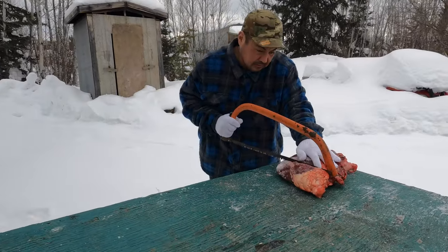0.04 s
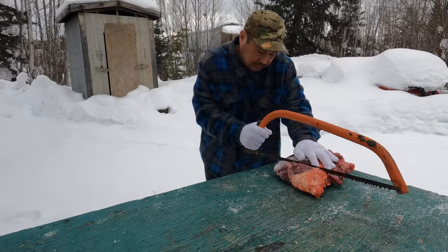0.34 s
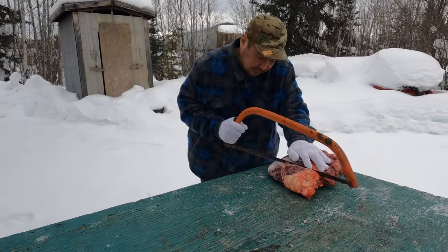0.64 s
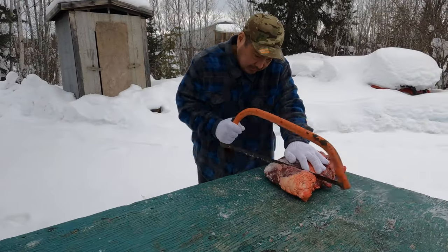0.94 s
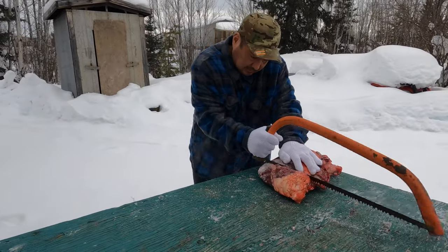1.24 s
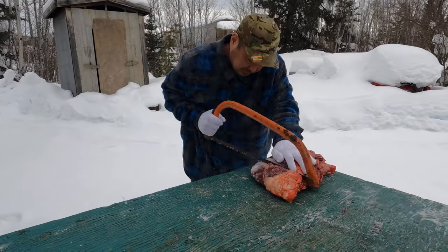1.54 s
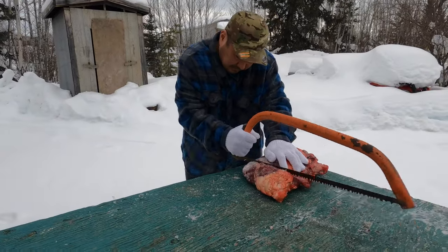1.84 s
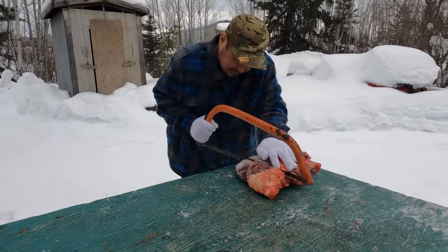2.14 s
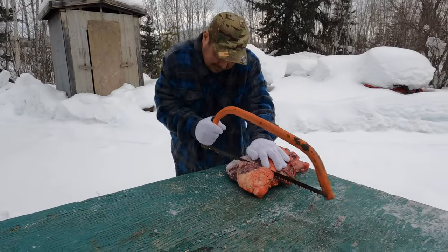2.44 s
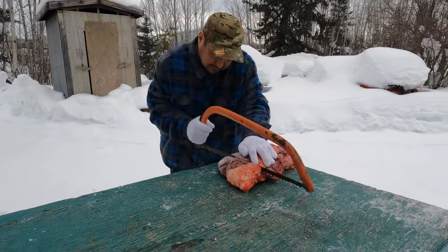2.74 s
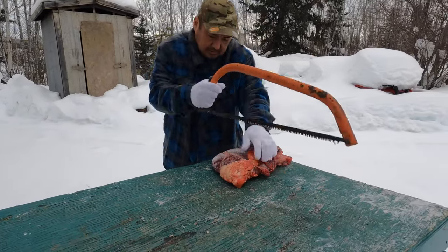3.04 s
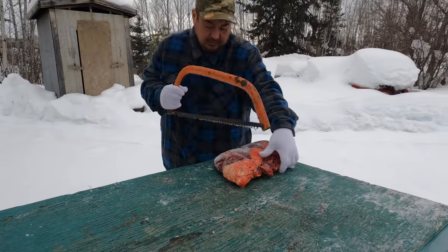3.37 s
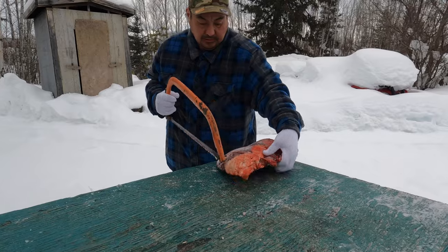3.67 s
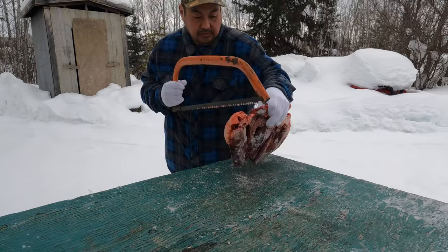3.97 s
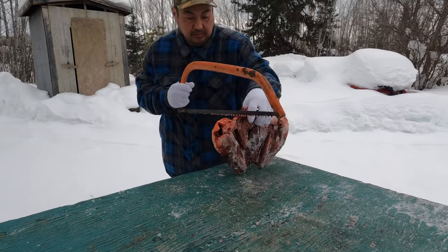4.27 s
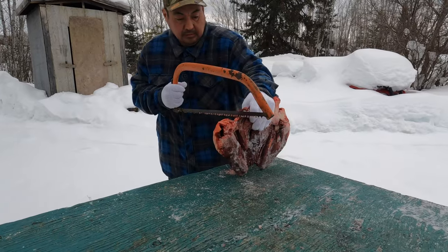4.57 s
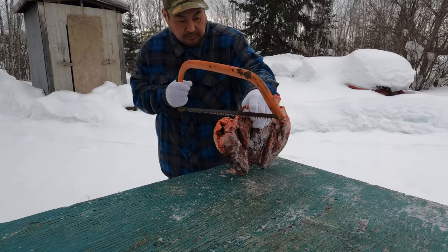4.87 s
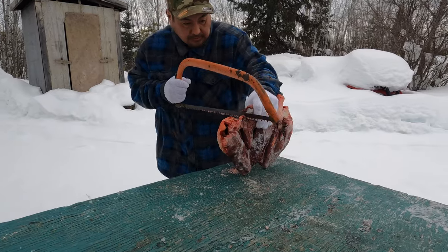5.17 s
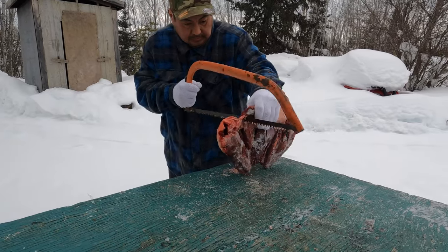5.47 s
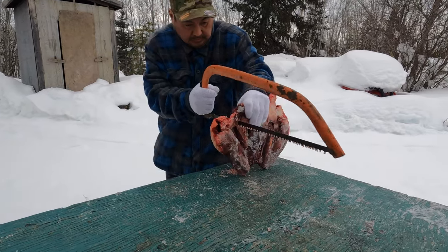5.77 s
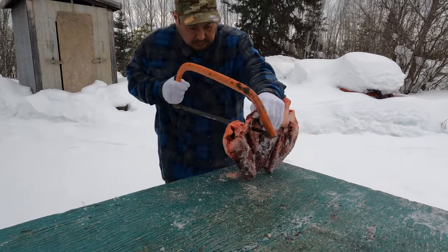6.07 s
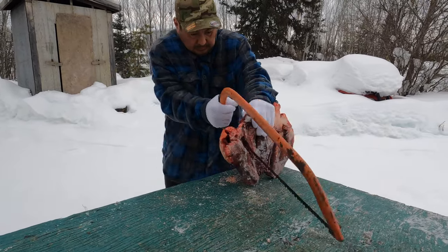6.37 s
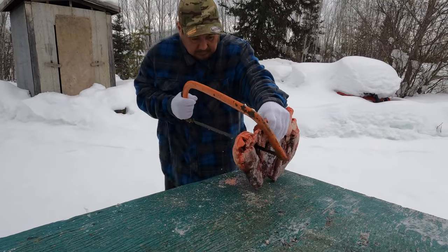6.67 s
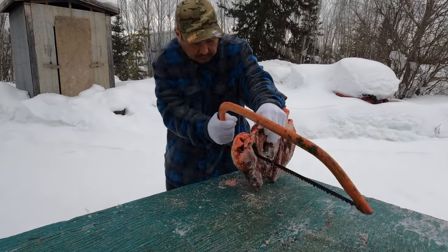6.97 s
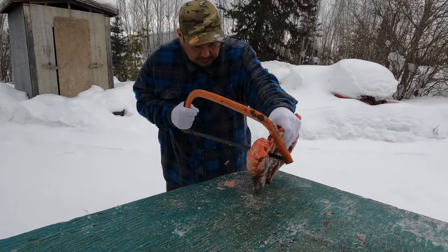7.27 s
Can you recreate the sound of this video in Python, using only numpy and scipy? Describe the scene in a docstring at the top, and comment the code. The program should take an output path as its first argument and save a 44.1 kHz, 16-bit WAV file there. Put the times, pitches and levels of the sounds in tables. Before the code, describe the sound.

Saw strokes hiss and scrape through frozen meat, bumping a plywood table; the joint clatters, then the blade rasps unevenly through bone.

```python
"""A bow saw cuts frozen meat on a plywood table, outdoors in snow, a metre or two away.
Pulls and pushes alternate, and every tooth tears off an icy chip. First the teeth hiss through flesh
while the frame scrapes and bumps the table. The saw breaks through, and the joint of meat is stood
on end with a clatter. Then longer strokes rasp into bone and shake the table top.
The steel blade sings as it slides, and faint outdoor air lies under it all."""
import sys
import numpy as np
from scipy import signal
from scipy.fft import rfft, irfft
from scipy.io import wavfile
from scipy.ndimage import uniform_filter1d

SR = 44100
rng = np.random.default_rng(int(sys.argv[2]) if len(sys.argv) > 2 else 0)


def to_wav(s):
    """Save 16-bit WAV."""
    ch = np.atleast_2d(s).T  # columns
    pcm = np.round(np.clip(ch, -1, 1) * 32767)  # PCM
    wavfile.write(sys.argv[1], SR, pcm.astype(np.int16))


N = 322349
TIME = np.arange(N) / SR
TAP_TIME = TIME[:SR // 3]  # seconds since a tap


def amp(db):
    """Turn decibels into a gain."""
    return 10 ** (np.asarray(db) / 20)


def unit(x):
    """Scale to an average power of 1."""
    return x / np.sqrt(np.mean(x ** 2))


def add(track, start_s, sound):
    """Mix a sound in at a given time."""
    i = max(int(start_s * SR), 0)
    track[i:i + len(sound)] += sound[:N - i]


def wander(per_s, size=N):
    """A random curve, roughly between -1 and 1, that heads for a new value per_s times a second."""
    knots = rng.standard_normal(size // 12)
    return 1.1 * np.interp(TIME[:size] * per_s, np.arange(len(knots)), knots)


def swells(events):
    """Pushes that each build up and let go."""
    force = np.zeros(N)
    for start_s, length_s, db in events:
        add(force, start_s, amp(db) * np.sqrt(np.hanning(int(length_s * SR))))
    return force


def soften(x, hz, kind="low", order=2):
    """Gently keep only the low, or the high, side of a frequency."""
    return signal.sosfilt(signal.butter(order, min(hz, SR / 3), kind, fs=SR, output="sos"), x)


def colour(x, tone, peaks=(), size=4096):
    """Shape a sound with a broad tone curve and ringing peaks that stand on it."""
    hz = np.maximum(np.arange(size // 2 + 1) * SR / size, 1)
    tone_hz, tone_db = np.transpose(tone)
    gain = amp(np.interp(np.log(hz), np.log(tone_hz), tone_db))
    gain *= np.minimum(hz / tone_hz[0], 1) ** 2
    gain *= np.sqrt(1 + sum(amp(2 * db) / (1 + (2 * (hz - f) / width) ** 2) for f, width, db in peaks))
    # make the filter ring after a hit, never before it
    cepstrum = irfft(np.log(unit(gain) + 1e-6))
    cepstrum[1:size // 2] *= 2
    cepstrum[size // 2 + 1:] = 0
    return signal.oaconvolve(x, irfft(np.exp(rfft(cepstrum))))[:len(x)]


def resonate(x, hz, width_hz):
    """Make a sound ring at a pitch that can glide."""
    turn = np.exp(2j * np.pi * np.cumsum(hz) / SR)
    pole = np.exp(-np.pi * width_hz / SR)
    return 2 * np.real(turn * signal.lfilter([1 - pole], [1, -pole], x / turn))


# tone of the outdoor air: f/Hz, level/dB
AIR_TONE = [(20, 20.5), (200, -1.5), (700, -15), (1400, -12), (14000, -35)]
def air(db):
    """Outdoor air: a low rumble with a faint hiss."""
    return amp(db) * colour(rng.standard_normal(N), AIR_TONE)


# notes of the plywood top: f/Hz, level/dB, time to fade by 60 dB/s
PLYWOOD_NOTES = [(66.8, -2, 0.51), (86.6, -1.5, 0.49), (133.9, -6, 0.48), (169.05, -0.5, 0.23),
                 (197.2, 5, 0.12), (231.8, -3, 0.24), (295.9, -2.5, 0.19), (327, -7.5, 0.16),
                 (385.8, -5.5, 0.16), (481.5, -2.5, 0.081), (614, 5, 0.045), (977, 0, 0.1)]
def table_ring(scatter_db, detune):
    """The table rings after a tap; spot and load shift its notes, and loose meat adds a dull blur."""
    hz, db, fade_s = np.transpose(PLYWOOD_NOTES)[:, :, None]
    strength, shift = rng.standard_normal((len(hz), 2)).T[:, :, None]
    sign = (-1) ** np.arange(len(hz))[:, None]
    fade = amp(db + scatter_db * strength) * np.exp(-np.log(1000) * TAP_TIME / fade_s)
    notes = sign * fade * np.sin(2 * np.pi * hz * (1 + detune * shift) * TAP_TIME)
    blur = unit(soften(rng.standard_normal(len(TAP_TIME)), 500)) * np.exp(-TAP_TIME / 0.03)
    return notes.sum(axis=0) + amp(-6) * blur


def table_shake(taps, push, dull_hz, crumble, low_hz=45):
    """Tiny taps and crumbling noise pass into the table, which rumbles as loudly as it is pushed."""
    force = taps + crumble * rng.standard_normal(N)
    force = soften(soften(force, low_hz, "high"), dull_hz, order=1)
    ring = table_ring(scatter_db=-2.5, detune=0)
    usual_level = np.std(signal.oaconvolve(force, ring)[:N][push > 1e-6])
    return signal.oaconvolve(force * push, ring)[:N] / usual_level


def grind(bites, smooth, flicker_db, patchy_db):
    """Ice crumbles unevenly; each chip chirps for a few milliseconds at its own pitches."""
    hz, _, cells = signal.stft(rng.standard_normal(N), SR, nperseg=512)
    chirps = uniform_filter1d(rng.standard_normal(cells.shape), size=4, axis=0)
    chirps = unit(uniform_filter1d(chirps, size=2, axis=1))
    depth_db = flicker_db / np.sqrt(1 + (hz[:, None] / 7000) ** 2)  # fine dust hisses more evenly
    dust = unit(signal.istft(cells * amp(depth_db * chirps))[1][:N])
    return dust * amp(patchy_db * wander(45)) * (smooth + bites) / (smooth + 1)


def swish(noise, low_hz):
    """The soft band of noise that rubbing makes."""
    return unit(soften(soften(noise, low_hz, "high", order=1), 2.83 * low_hz))


# gloves rub the joint as it is turned over: t/s, relative level/dB
GLOVE_RUBS = [(2.99, -44), (3.29, -47.5), (3.35, -80), (3.46, -53.5), (3.58, -59.5), (3.68, -33.5),
              (3.79, -46), (4.0, -35), (4.26, -47), (4.52, -57.5), (4.72, -39), (4.82, -65)]
# the blade brushes over frost: t/s, length/s, level/dB
FROST_BRUSHES = [(1.009, 0.029, -34.5), (4.657, 0.065, -47)]
# crumbs of ice snap: t/s, level/dB
ICE_SNAPS = [(0.876, -21), (3.487, -46), (4.557, -38.5), (5.059, -37)]
def gloves_and_frost():
    """Gloves and blade swish over frost, the shifting joint rumbles, and crumbs of ice snap."""
    frost = rng.standard_normal(N)
    grains = frost * amp(4.5 * wander(350))
    turning = amp(np.interp(TIME, *np.transpose(GLOVE_RUBS), left=-np.inf, right=-np.inf) - 9.5)
    rumble = table_shake(grains, amp(15) * turning, dull_hz=149, crumble=0, low_hz=92.5)
    rustle = turning * amp(3 * wander(21.77)) * swish(grains, low_hz=730)
    brush = swells(FROST_BRUSHES) * swish(frost, low_hz=3140)
    snaps = np.zeros(N)
    for start_s, db in ICE_SNAPS:
        add(snaps, start_s, amp(db) * np.exp(-TAP_TIME / 0.004))
    crackle = unit(soften(soften(frost, 1600, "high", order=1), 5500))
    return rustle + rumble + brush + snaps * crackle


# steel or icy meat catches and judders: t/s, length/s, level/dB
SCRAPES = [(0.359, 0.038, -30), (0.43, 0.025, -30), (0.606, 0.068, -29), (0.674, 0.0072, -23.5),
           (0.905, 0.049, -30.5), (.965, 0.03, -27), (1.047, 0.014, -26.5), (1.106, 0.026, -25),
           (1.148, 0.018, -23), (1.265, 0.03, -26.5), (1.486, 0.03, -27.5), (1.615, 0.066, -32),
           (1.936, 0.042, -25.5), (1.981, 0.068, -25), (2.119, 0.05, -26), (2.171, 0.048, -21.5),
           (2.316, 0.035, -27.5), (2.391, 0.065, -32.5), (2.527, 0.067, -25), (2.665, 0.069, -35.5),
           (3.9, 0.033, -33.5), (5.998, 0.023, -30), (6.088, 0.011, -33.5), (6.27, 0.025, -27),
           (6.34, 0.04, -23), (7.006, 0.039, -27)]
# tone of a scrape: f/Hz, level/dB
SCRAPE_TONE = [(300, -3), (650, 3.5), (4500, 1.5), (5800, -5.5), (14000, -37.5)]
# ring of the steel frame: f/Hz, width/Hz, boost/dB
FRAME_RING = [(1080, 170, 6.2), (1553, 28, 10.5), (2300, 240, 5.8), (3310, 110, 4.1), (3493, 370, 8.8)]
def scrapes(slip_hz, jitter, slip_s):
    """Steel sticks and slips quickly on plywood: a gritty squeak that drags at the table."""
    press = swells(SCRAPES)
    phase = np.cumsum(slip_hz * np.exp(jitter * wander(60))) / SR
    slips = unit(np.exp(-(phase % 1) / (slip_hz * slip_s)))
    squeak = unit(np.diff(slips, prepend=0)) * amp(2 * wander(310))
    grit = grind(slips, smooth=0.13, flicker_db=3, patchy_db=2)
    judder = table_shake(slips, amp(-3.5) * press, dull_hz=85.5, crumble=5.4)
    return colour(press * (amp(-10.5) * squeak + amp(-3) * grit), SCRAPE_TONE, FRAME_RING) + judder


# tone of a hard hit: f/Hz, level/dB
CRACK_TONE = [(250, -6.5), (1200, -3), (4500, -11), (5800, -22.5), (7500, -23.5), (9000, -39), (14000, -63)]
def knocks(blows, peaks, low_hz, crack_s=0.0016, tail_s=0.011, tail_db=-7, tail_hz=1770, crunch_db=0):
    """A blow thuds on the table; hard contact adds a crack and a rattle, crunchy if ice is crushed."""
    thuds, cracks = np.zeros((2, N))
    for start_s, thud_db, crack_db in blows:
        dull_hz = 488 * 2 ** ((crack_db - thud_db) / 19.5)  # harder blows are briefer, so brighter
        ring = table_ring(scatter_db=3, detune=0.045)
        ring = soften(soften(ring, dull_hz), low_hz, "high")
        add(thuds, start_s, amp(thud_db) * ring / np.std(ring[:SR // 30]))
        snap, rattle = rng.standard_normal((2, len(TAP_TIME)))
        snap *= np.exp(-TAP_TIME / crack_s)
        rattle = soften(rattle, tail_hz, order=1) * amp(crunch_db * wander(393, len(TAP_TIME)))
        rattle *= amp(tail_db) * np.exp(-TAP_TIME / tail_s)
        add(cracks, start_s, amp(crack_db) * (snap + rattle))
    return thuds + 2 * colour(cracks, CRACK_TONE, peaks)


# the joint hits the table: t/s, thud level/dB, relative crack level/dB
JOINT_HITS = [(3.554, -46, -46), (3.658, -31, -35), (3.672, -24, -59), (3.703, -44, -30), (3.867, -34, -29),
              (3.934, -21, -24.5), (3.956, -23.5, -22.5), (4.002, -22.5, -18.5), (4.025, -16.5, -41),
              (4.045, -20, -26.5), (4.067, -18, -45), (4.082, -34, -33.5), (4.115, -27, -30),
              (4.248, -28.5, -29), (4.393, -23.5, -68)]
# hollow ring of the frozen joint: f/Hz, width/Hz, boost/dB
JOINT_RING = [(640, 53, 9), (1650, 67, 4.5), (3850, 1000, -0.5)]
def joint_clatter():
    """The frozen joint clatters and crunches as it is stood on end."""
    return knocks(JOINT_HITS, JOINT_RING, low_hz=100, crack_s=0.003,
                  tail_s=0.013, tail_db=-5, tail_hz=2200, crunch_db=4)


# the saw bumps meat and table, and during the bone strokes the joint rocks back onto the table after a push:
# t/s, thud level/dB, relative crack level/dB
TABLE_BUMPS = [(.554, -20.5, -83), (.612, -14.5, -64), (0.684, -19, -43), (1.064, -12.5, -37.5),
               (1.239, -13.5, -34.5), (1.38, -28, -19), (1.66, -27.5, -78), (1.754, -14, -36.5),
               (1.925, -19.5, -45), (1.975, -20.5, -47), (2.115, -22.5, -90), (2.241, -23, -29),
               (2.304, -12.5, -28), (2.483, -12.5, -29.5), (2.741, -27.5, -30), (3.166, -25, -51.5),
               (5.291, -18, -47), (5.453, -16, -57.5), (5.855, -16, -52), (6.374, -12.5, -24)]
# the frame slams down: t/s, thud level/dB, relative crack level/dB
FRAME_SLAMS = [(1.367, -13.5, -23), (2.952, -12, -15.5)]
# clack of plywood under a slam: f/Hz, width/Hz, boost/dB
PLYWOOD_CLACK = [(598, 82, 8.5), (1100, 600, 10), (1990, 390, 4.5)]
def table_bumps():
    """The steel frame bumps and slams on the table, hardest as the saw breaks through; during the bone strokes
    the joint rocks back onto the table."""
    return knocks(TABLE_BUMPS, (), low_hz=35) + knocks(FRAME_SLAMS, PLYWOOD_CLACK, low_hz=127)


def strokes(turns_s, teeth_per_stroke, drag, rest_s):
    """Teeth per second, speed (drag at the turns), progress 0-1 and stroke number (even = pull)."""
    turns_s = np.array(turns_s)
    number = np.searchsorted(turns_s[1:-1], TIME)
    start = turns_s[number] + rest_s * (number % 2 == 0)  # the arm rests before each pull
    length = turns_s[number + 1] - start
    progress = np.clip((TIME - start) / length, 0, 1)
    swing = np.sin(np.pi * progress)
    sawing = (TIME >= turns_s[0] + rest_s) & (TIME < turns_s[-1])
    rate = sawing * teeth_per_stroke * np.pi / 2 * swing / length
    return rate, sawing * np.hypot(swing, drag), progress, number


def ease(force):
    """The springy frame smooths changes of force."""
    return np.maximum(uniform_filter1d(force, SR // 50), 0)


def teeth(rate, jitter, scatter_db, chip_s):
    """Every passing tooth tears off a chip of its own size."""
    passed = np.cumsum(rate * np.exp(jitter * wander(300))) / SR
    new_tooth = np.diff(np.floor(passed), prepend=0) > 0
    chips = new_tooth * amp(scatter_db * rng.standard_normal(N))
    bites = signal.oaconvolve(chips, np.exp(-TAP_TIME / chip_s))[:N]
    return bites / np.sqrt(np.mean(bites[rate > 0] ** 2))


# tone of the teeth's hiss: f/Hz, level/dB
HISS_TONE = [(300, 18), (900, 9), (2900, 4.5), (4000, 7), (5200, 0), (8000, -2.5), (10500, -8.5),
             (12000, -14), (14000, -20.5)]
# steady ring of the blade: f/Hz, width/Hz, boost/dB
BLADE_RING = [(4100, 19, 4)]
# notes sung by the free length of blade: f/Hz, width/Hz, boost/dB
BLADE_SONG = [(5250, 55, 19), (5510, 30, 10)]
def blade(hiss, progress, number):
    """The teeth make the steel ring: the further it sticks out, the louder and lower it sings."""
    stick_out = np.cos(np.pi * progress) * (-1) ** number / 2  # -0.5 to 0.5
    hiss = colour(hiss, HISS_TONE, BLADE_RING)
    pulling = number % 2 == 0
    drive = hiss * amp(16.25 * (stick_out - 0.5) - 4 * pulling)  # a pull sings less
    bend = 1 - 0.011 * stick_out
    return hiss + sum(amp(db) * resonate(drive, hz * bend, width) for hz, width, db in BLADE_SONG)


# strokes in flesh; effort builds, then eases near the end of the cut: t/s, hiss level/dB
FLESH_STROKES = [(0, -48.5), (.2, -38), (.4, -40.5), (0.689, -33.5), (0.891, -37.5), (1.191, -33),
                 (1.37, -44), (1.71, -36), (1.89, -43), (2.191, -40), (2.419, -46), (2.749, -43)]
def flesh_cut(end_s):
    """Teeth hiss finely through frozen flesh, swelling and fading with each stroke."""
    starts, hiss_db = np.transpose(FLESH_STROKES)
    rate, speed, progress, number = strokes([*starts, end_s], teeth_per_stroke=48, drag=0.6, rest_s=0.005)
    bites = teeth(rate, jitter=0.24, scatter_db=8, chip_s=0.0065)
    hiss = ease(amp(hiss_db[number]) * speed) * grind(bites, smooth=1, flicker_db=5, patchy_db=4)
    rumble = table_shake(bites, ease(amp(-32) * speed ** 0.054), dull_hz=204, crumble=5.6)
    return blade(hiss, progress, number) + rumble


# strokes in bone, each lasting until the next: t/s, rasp level/dB, hiss level/dB,
# relative groan level/dB, rise in pressure over the stroke/dB, rocking joint's f/Hz
BONE_STROKES = [(4.81, -44, -49.5, -22.5, -6, 84), (5.206, -35, -43, -17, 23, 205),
                (5.371, -45, -52.5, -28, -20.5, 101.6), (5.675, -37, -41, -20, 23.5, 286),
                (5.87, -39.5, -47, -26, -11.5, 135.8), (6.196, -32, -32, -19, 18.5, 283.2),
                (6.415, -50, -40.5, -30.5, -34.5, 150.1), (6.862, -41, -28.5, -15, 10, 199.7),
                (7.089, -39.5, -36.5, -22.5, 1, 277)]
# tone of the rasp: f/Hz, level/dB
RASP_TONE = [(300, 17.5), (600, 12), (800, -18), (1150, 7.5), (2900, 1.5), (4200, -0.5), (5200, -4.5),
             (7000, -3.5), (14000, -49)]
# ring of the blade wedged in bone: f/Hz, width/Hz, boost/dB
WEDGED_RING = [(1617, 35, 7), (2097, 200, 11.5), (3970, 95, 1)]
def bone_cut(end_s):
    """Teeth snag and rasp in bone; leaning on the saw makes the joint rock and the table groan."""
    starts, rasp_db, hiss_db, groan_db, lean_db, rock_hz = np.transpose(BONE_STROKES)
    turns_s = [*starts, end_s]
    rate, speed, progress, number = strokes(turns_s, teeth_per_stroke=44, drag=0.034, rest_s=0.05)
    pressure = amp(lean_db[number] * (progress - 0.5))
    bites = teeth(rate, jitter=0.2, scatter_db=4, chip_s=0.0022)
    snags = teeth(rate / 4, jitter=0.6, scatter_db=4, chip_s=0.004)
    crumbs = lambda: grind((bites + snags) / 2, smooth=0.55, flicker_db=5.5, patchy_db=1.5)
    hiss = ease(amp(hiss_db[number]) * speed ** 0.92 * pressure ** 0.97) * crumbs()
    rasp = ease(amp(rasp_db[number]) * speed ** 0.34 * pressure) * crumbs()
    push = ease(amp(groan_db[number]) * speed ** 0.5 * pressure)
    groan = table_shake(bites, push, dull_hz=225, crumble=1.9, low_hz=51.3)
    falling_hz = rock_hz[number] * 2 ** (0.31 * (0.5 - progress))
    rock = amp(-2.5) * push * unit(resonate(rng.standard_normal(N), falling_hz, width_hz=19.8))
    return blade(hiss, progress, number) + colour(rasp, RASP_TONE, WEDGED_RING) + (groan + rock) / 2


def scene():
    """Everything happens at one spot; snow swallows the echoes, so only a little scatter widens it."""
    work = flesh_cut(end_s=2.95) + bone_cut(end_s=7.45) + gloves_and_frost()
    work += scrapes(slip_hz=635.7, jitter=0.22, slip_s=0.0014)
    work += table_bumps() + joint_clatter()
    # sound bouncing off the table and the person sawing differs between left and right
    echo_fade = np.exp(-TAP_TIME / 0.0067) + amp(-43) * np.exp(-TAP_TIME / 0.29)
    echo = rng.standard_normal(len(TAP_TIME)) * echo_fade
    treble = soften(work, 900, "high", order=1)
    side = amp(-9) * signal.oaconvolve(treble, echo / np.linalg.norm(echo))[:N]
    # so do the deep rumble and the air
    side += amp(-36) * soften(soften(work, 38, order=3), 60, "high") + air(db=-61.5)
    return work + air(db=-49 + 2 * wander(26)) + np.array([side, -side])


def record(dry):
    """Take away the deepest bass and cut the highest treble steeply."""
    thin = soften(dry, 26, "high", order=3)
    return signal.sosfilt(signal.ellip(8, 0.2, 70, 13900, fs=SR, output="sos"), thin)


dry = scene()
out = record(dry)
to_wav(out)
```